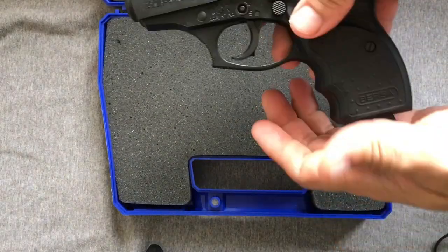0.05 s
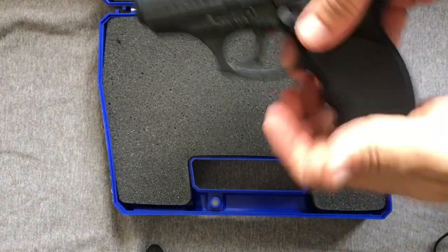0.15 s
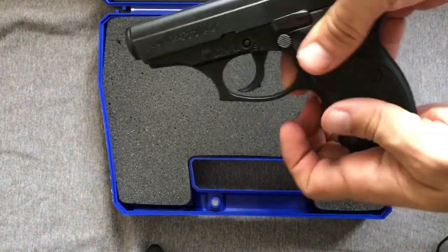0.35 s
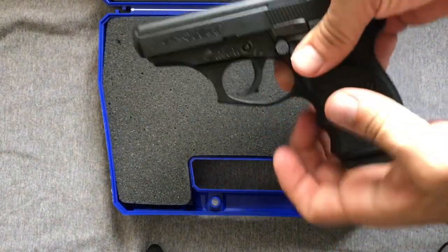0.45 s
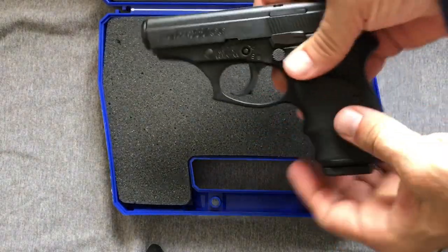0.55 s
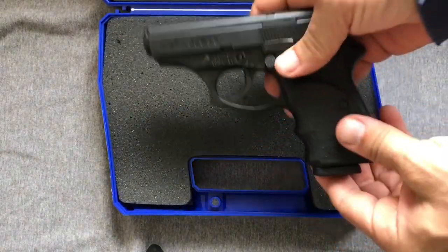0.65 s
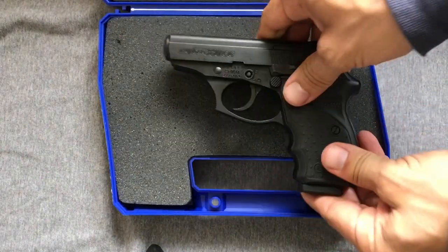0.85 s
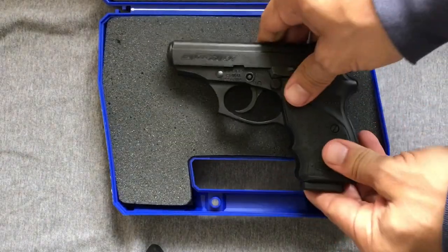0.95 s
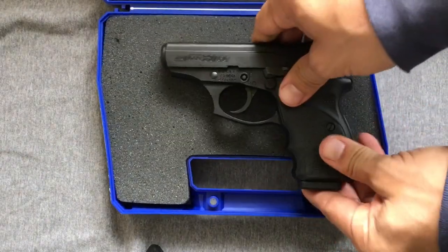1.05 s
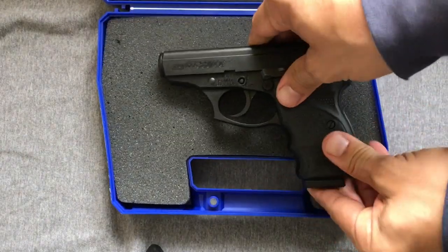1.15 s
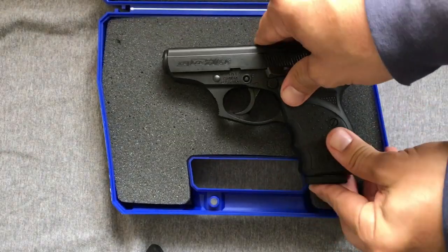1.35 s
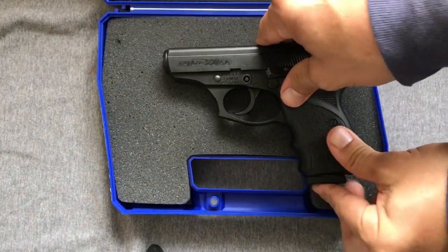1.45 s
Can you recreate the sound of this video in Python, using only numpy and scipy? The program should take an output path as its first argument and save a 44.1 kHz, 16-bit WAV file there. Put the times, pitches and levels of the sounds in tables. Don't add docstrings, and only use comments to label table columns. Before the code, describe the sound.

Pistol magazine pushed home with a hard, bright steel double snap, followed by a hollow grip knock, faint fingertip taps, low hand rumble and a small final metallic tick; close phone microphone, quiet indoor room.

```python
import sys
import numpy as np
from scipy import signal
from scipy.fft import rfft, irfft, next_fast_len
from scipy.io import wavfile
from scipy.ndimage import uniform_filter1d

SR = 44100
rng = np.random.default_rng(int(sys.argv[2]) if len(sys.argv) > 2 else 0)


def dump_mix(stems):
    frames = np.atleast_2d(stems).T
    limited = np.clip(frames, -1, 1)
    pcm = np.round(limited * 32767).astype(np.int16)
    wavfile.write(sys.argv[1], SR, pcm)


def to_linear_factor(level_db):
    exponent = np.asarray(level_db, float) / 20
    return 10 ** exponent


N = 66150
LEAD = 4410

# start_s, peak_db, contact_ms, dull_above_hz
STEEL_BLOWS = [(0.216, -25.5, 3.7, 4380), (0.2245, -17.5, 1.5, 6000), (0.2275, -3, 1.6, 13560),
               (0.2289, 2.5, 1.5, 13400), (0.2322, -7.5, 1.15, 9000), (0.2381, 2.5, 1.46, 14960),
               (0.24, -3, .8, 8896), (0.2472, -10, 0.92, 8000), (0.2645, -20.5, 1.5, 6954),
               (0.5485, -44, 1.8, 4490), (0.6674, -54, 1.4, 8070), (1.22, -53, 5.6, 6960),
               (1.4765, -34.5, 1.4, 3450), (1.485, -49, 1.34, 6000)]
# pitch_hz, level_db, t60_s
STEEL_MODES = [(1484, -6.5, 0.092), (2033, -7, .04), (2869, 0, 0.13), (3185, -4.5, .09),
               (4183, -0.5, 0.059), (4246, -2, .07), (4588, -4, 0.2), (5235, -3.5, 0.11), (5436, -4, .16),
               (5440, -4, 0.2), (6053, 3.5, 0.07), (6070, -3, 0.069), (7250, -6.5, .07)]
# freq_hz, density_db
STEEL_CONTACT = [(600, -41), (900, -17.5), (1800, -10.5), (3000, -5.5), (4300, -4.5), (6000, -0.5),
                 (7500, -9.5), (11000, -13.5), (16200, -20)]
# start_s, peak_db, contact_ms, dull_above_hz
GRIP_BLOWS = [(0.184, -33, 5.0, 600), (0.299, -50, 2.4, 700), (0.4197, -20, 0.83, 6000),
              (0.4232, -28.5, 1.5, 7040), (0.4365, -30, 2.5, 5110), (0.4435, -39, 1.76, 3990),
              (0.466, -36, 3.1, 1498), (0.476, -35.5, 1.25, 2463), (0.5357, -40, 2.5, 2000),
              (0.745, -36.5, 8.0, 900), (0.9587, -42, 17, 1780), (1.0, -43, 6.1, 2494),
              (1.015, -45, 5.0, 3000), (1.027, -44, 3.4, 3505), (1.1308, -43, 8.3, 700),
              (1.278, -40, 9.0, 2220), (1.487, -38, 5.0, 885)]
# pitch_hz, level_db, t60_s
GRIP_MODES = [(650, -13, 0.027), (1170, -4, 0.05), (1570, -0.5, 0.048), (1780, -9, .02), (2590, -13, .03),
              (2840, -13, .04), (3940, -17, 0.02993), (4570, -17.5, .04)]
# freq_hz, density_db
GRIP_CONTACT = [(150, -5.5), (400, -16), (700, -12), (1400, -9), (2500, -17), (6000, -21), (16000, -45)]
# start_s, peak_db, pitch_hz, t60_s
SINGLE_NOTES = [(0.184, -33.5, 345, 0.021), (0.1875, -46, 795, 0.022), (0.2025, -35, 380, 0.018),
                (0.2387, -27, 839, 0.14), (0.2385, -33.5, 1005, 0.12), (0.2385, -29, 1170, .16),
                (0.2386, -34, 4588, .3), (0.2385, -36, 2869, .1), (0.335, -45, 3300, 0.13),
                (0.4199, -17.5, 1607, 0.0088), (0.4216, -27, 219, 0.027), (0.4235, -30, 814, 0.038),
                (0.429, -31, 1500, 0.041), (0.541, -57, 3300, 0.031), (0.549, -52.5, 3880, 0.046),
                (0.7515, -44.5, 606, 0.014), (1.134, -46, 1110, .02), (1.283, -43.5, 400, 0.031),
                (1.287, -45, 1040, .02), (1.476, -41.5, 2840, .025), (1.4785, -48.5, 2000, 0.018)]
# start_s, peak_db, rise_ms
AIR_PUSHES = [(0.184, -25, 4.6), (0.237, -19.5, 6.6), (0.296, -21, 3.4), (0.4185, -21, 4),
              (0.472, -32.5, 5.3), (0.535, -26.5, 12), (0.742, -35, 5.4), (0.9555, -25, 4.3),
              (1.131, -27, 6.4), (1.386, -33, 7.8), (1.485, -39.5, 5)]
# start_s, peak_db, rise_ms
FINGER_TAPS = [
    (0.476, -32, 0.33),
    (0.7392, -37.5, 0.26),
    (0.7517, -33.5, 0.32),
    (1.017, -34.5, 0.31),
    (1.135, -37.5, .3),
]
# freq_hz, t60_s
ROOM_DECAY = [(300, 0.7), (1000, 0.49), (2500, 0.23), (5500, 0.23), (10000, 0.18), (16000, 0.24)]
# time_s, level_db
HAND_AIR_LEVEL = [(0.0, -26), (0.146, -34), (0.166, -34), (0.324, -19), (0.438, -26), (0.472, -25.5),
                  (0.546, -28), (0.7, -40), (0.872, -31), (0.926, -37), (0.968, -36.5), (1.018, -34.5),
                  (1.148, -29.5), (1.194, -43), (1.432, -39.5), (1.5, -42)]
# freq_hz, density_db
HAND_RUMBLE = [(25, -11), (60, -30.5), (150, -46.5), (400, -62)]
# time_s, level_db
PALM_LEVEL = [(.165, -68), (.19, -47.5), (.24, -42), (.3, -38.5), (.325, -37), (.34, -100), (.41, -85),
              (.43, -57), (.6, -56), (.7, -78), (.75, -53.5), (.82, -55.5), (.93, -61), (.96, -48.5),
              (1.05, -61), (1.135, -57), (1.2, -71), (1.5, -57)]
# freq_hz, density_db
PALM_SPECTRUM = [(70, -0.5), (130, -2), (300, -4), (500, -11.5), (1000, -31.5)]
# time_s, level_db
SLEEVE_LEVEL = [(0, -35), (.15, -96), (.4, -54.5), (.6, -65), (.7, -71), (.85, -67), (1.03, -58),
                (1.1, -59.5), (1.2, -55.5), (1.3, -63), (1.45, -62), (1.5, -52)]
# freq_hz, density_db
SLEEVE_SPECTRUM = [(300, -0.5), (1000, -2.5), (2500, -1.5), (5500, -10), (8000, -18.5)]
# freq_hz, density_db
FLOOR_SPECTRUM = [(60, 1.5), (110, -7.5), (400, -11.5), (1000, -8), (2000, -13), (4500, -27.5), (9000, -33),
                  (16200, -36)]
# time_s, gain_db, spared_hz, spared_width_hz
DROPOUTS = [
    (.351, -15, 5700, 1800),
    (.776, -15, 3400, 300),
    (1.287, -14, 5700, 300),
]


def rms_one(x):
    return x / np.sqrt(np.mean(x ** 2) + 1e-20)


def in_time(rows):
    return np.interp(np.arange(N) / SR, *np.transpose(rows))


def at_hz(points, hz):
    freq_hz, value = np.transpose(points)
    return np.interp(np.log(hz), np.log(freq_hz), value)


def band_pass(order, low_hz, high_hz):
    return signal.butter(order, [low_hz, high_hz], "band", fs=SR, output="sos")


def colour(x, tone):
    size = next_fast_len(len(x) + 8192)
    hz = np.maximum(np.arange(size // 2 + 1) * SR / size, 1)
    db = at_hz(tone, hz)
    db = db + 12 * np.log2(np.minimum(hz / tone[0][0], 1))
    db = db - 18 * np.log2(np.maximum(hz / tone[-1][0], 1))
    cepstrum = irfft(db * np.log(10) / 20, size)
    cepstrum[1:size // 2] *= 2
    cepstrum[size // 2 + 1:] = 0
    response = np.exp(rfft(cepstrum))
    return irfft(rfft(x, size) * response, size)[:len(x)]


def settled_noise(tone):
    return rms_one(colour(rng.standard_normal(N + SR), tone)[SR:])


def drift(rate_hz):
    r = np.exp(-2 * np.pi * rate_hz / SR)
    return rms_one(signal.lfilter([1], [1, -2 * r, r * r], rng.standard_normal(N + SR))[SR:])


def even(x, shape):
    for _ in range(3):
        spectrum = rfft(x)
        size = np.sqrt(uniform_filter1d(np.abs(spectrum) ** 2, size=25) + 1e-20)
        flat = irfft(spectrum / size, len(x))
        x = shape * flat / np.sqrt(uniform_filter1d(flat ** 2, size=31) + 1e-12)
    return x


def ring(clicks, hz, t60_s):
    r, w = to_linear_factor(-60 / (t60_s * SR)), 2 * np.pi * hz / SR
    return signal.lfilter([0, np.sin(w)], [1, -2 * r * np.cos(w), r * r], clicks + 1e-18)


def contact_shape(t, contact_ms, t60_s):
    onset_share, rattle_share, let_go = 0.6, 0.3, 1.4
    late = np.maximum(1000 * t / contact_ms - 1, 0)
    onset = np.minimum(onset_share + 1500 * t / contact_ms, 1)
    fall = (1 - rattle_share) * np.exp(-let_go * late) + rattle_share * to_linear_factor(-60 * t / t60_s)
    return onset * fall


def shake(strikes, modes, ring_db, spread_db):
    pair_split, partner_db, ring_from_hz = 0.004, -10, 600
    rings = np.zeros(len(strikes))
    for hz, db, t60_s in modes:
        for side in range(2):
            level_db = db + ring_db + side * partner_db + spread_db * rng.normal()
            rings += to_linear_factor(level_db) * ring(strikes, hz * (1 + side * pair_split), t60_s)
    return signal.sosfilt(signal.butter(4, ring_from_hz, "high", fs=SR, output="sos"), rings)


def blows(rows, tone, t60_s, modes, ring_db, spread_db):
    t = np.arange(SR // 8) / SR
    click = np.eye(1, len(t))[0]
    rough, strikes = np.zeros(N + LEAD + SR), np.zeros(N + LEAD + SR)
    for s, db, contact_ms, cut_hz in rows:
        i = int(LEAD + s * SR)
        shape = contact_shape(t, contact_ms, t60_s)
        grit = even(shape * rng.standard_normal(len(t)), shape)
        dull = signal.butter(2, min(cut_hz, 19000), fs=SR, output="sos")
        rough[i:i + len(t)] += to_linear_factor(db) * signal.sosfilt(dull, grit) / 2
        strikes[i:i + len(t)] += to_linear_factor(db) * signal.sosfilt(dull, click)
    gain = np.sqrt(np.sum(colour(np.eye(1, 4096)[0], tone) ** 2))
    return (colour(rough, tone) / gain + shake(strikes, modes, ring_db, spread_db))[:N + LEAD]


def steel():
    earlier = (-0.014, -12, 3.0, 6000)
    return blows([earlier] + list(STEEL_BLOWS), STEEL_CONTACT, 0.1, STEEL_MODES, ring_db=-26, spread_db=3.5)


def grip():
    return blows(GRIP_BLOWS, GRIP_CONTACT, 0.15, GRIP_MODES, ring_db=-11, spread_db=2.5)


def single_notes():
    out = np.zeros(N)
    for s, db, hz, t60_s in SINGLE_NOTES:
        out += ring(to_linear_factor(db) * (np.arange(N) == int(s * SR)), hz, t60_s)
    return out


def pushes(rows):
    rebound_share = 0.22
    t, out = np.arange(N) / SR, np.zeros(N)
    for s, db, rise_ms in rows:
        u = np.maximum(t - s, 0) * 1000 / rise_ms
        push = (u * np.exp(1 - u)) ** 3.1
        rebound = (u / 4) ** 2 * np.exp(2 - u / 2)
        out += to_linear_factor(db) * (push - rebound_share * rebound)
    return out


def room(x):
    room_db, gap_s = -14, 0.03
    edges_hz = 60 * 2 ** np.arange(0, 8.3, 1 / 3)
    t = np.arange(SR // 2) / SR
    white, tail = rng.standard_normal((2, SR // 2)), np.zeros(SR // 2)
    for k, (low, high) in enumerate(zip(edges_hz, edges_hz[1:])):
        band = signal.sosfilt(band_pass(2, low, high), white[k % 2])
        tail += band * to_linear_factor(-60 * t / at_hz(ROOM_DECAY, np.sqrt(low * high)))
    tail = tail * (1 - np.exp(-t / gap_s))
    return to_linear_factor(room_db) * signal.fftconvolve(x, tail / np.sqrt(np.sum(tail ** 2)))[:len(x)]


def hands():
    sway_hz, width_hz, rumble_db = 9, 9, -19.5
    band = band_pass(1, sway_hz - width_hz / 2, sway_hz + width_hz / 2)
    sway = rms_one(signal.sosfilt(np.vstack([band, band]), rng.standard_normal(N + SR))[SR:])
    rumble = settled_noise(HAND_RUMBLE) * to_linear_factor(3.4 * drift(9))
    return to_linear_factor(in_time(HAND_AIR_LEVEL)) * (sway + to_linear_factor(rumble_db) * rumble)


def palm():
    scuff = rms_one(colour(rng.standard_normal(N), PALM_SPECTRUM))
    return to_linear_factor(in_time(PALM_LEVEL) + 4.0 * drift(31)) * scuff


def sleeves():
    grains = rng.standard_normal(N) * to_linear_factor(1.5 * drift(12) + 1.5 * drift(150))
    return to_linear_factor(in_time(SLEEVE_LEVEL)) * rms_one(colour(grains, SLEEVE_SPECTRUM))


def room_floor():
    return to_linear_factor(-55) * settled_noise(FLOOR_SPECTRUM)


def scene():
    grip_room_db = -4.5
    clacks, knocks = steel(), grip()
    gun = clacks + knocks + room(clacks + to_linear_factor(grip_room_db) * knocks)
    touches = single_notes() + pushes(AIR_PUSHES) - pushes(FINGER_TAPS)
    return (gun[LEAD:] + touches + hands() + palm() + sleeves() + room_floor())[None]


def duck(x):
    shut_s, open_s, edge_s, gain_db = 0.3, 0.416, 0.0069, -4.5
    t = np.arange(N) / SR
    middle = signal.sosfiltfilt(band_pass(2, 70, 3000), x)
    shut = np.clip((t - shut_s) / edge_s, 0, 1) * (t < open_s)
    return x + (to_linear_factor(gain_db * shut) - 1) * middle


def drop_treble(x):
    half_s, from_hz = 0.008, 2000
    t = np.arange(N) / SR
    low = signal.sosfiltfilt(signal.butter(4, from_hz, fs=SR, output="sos"), x)
    for s, db, hz, width_hz in DROPOUTS:
        spared = signal.sosfiltfilt(band_pass(2, hz - width_hz / 2, hz + width_hz / 2), x)
        gain = to_linear_factor(db * np.exp(-((t - s) / half_s) ** 4))
        x = x + (gain - 1) * (x - low - spared)
    return x


def top_cut(x):
    return signal.sosfilt(signal.butter(12, 16300, fs=SR, output="sos"), x)


def record(dry):
    peak, cutoff_hz = 0.86, 16100
    x = drop_treble(duck(dry))
    x = x / (1 + np.abs(x / peak) ** 4) ** 0.25
    x = signal.sosfilt(signal.cheby2(20, 70, cutoff_hz + 450, fs=SR, output="sos"), x)
    return top_cut(x)


dry = scene()
out = record(dry)
dump_mix(out)
```